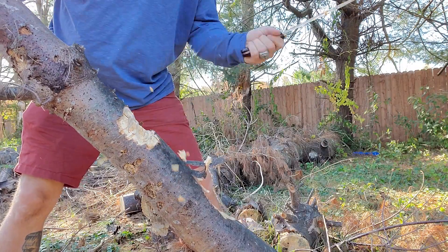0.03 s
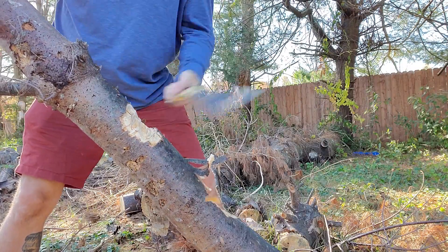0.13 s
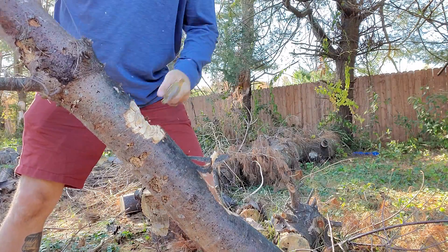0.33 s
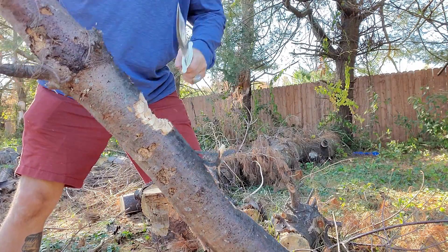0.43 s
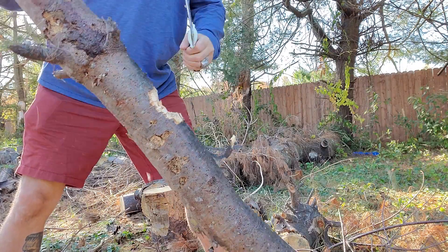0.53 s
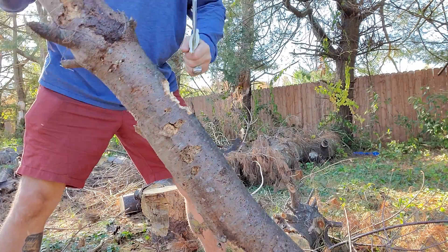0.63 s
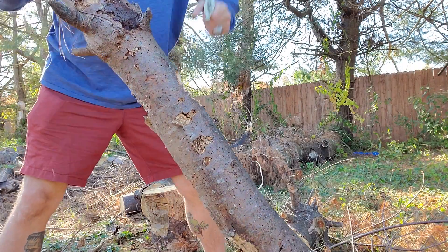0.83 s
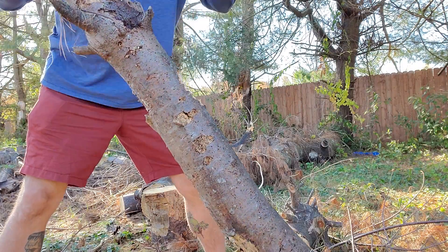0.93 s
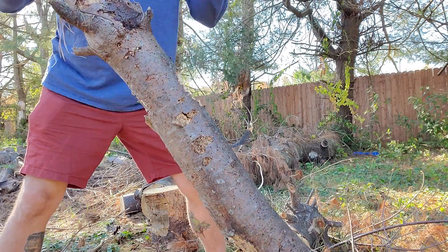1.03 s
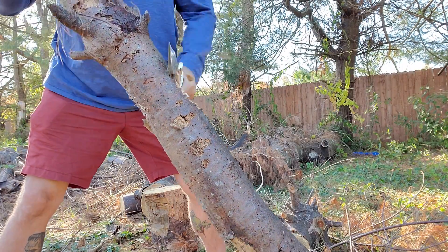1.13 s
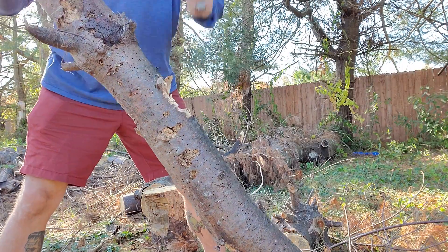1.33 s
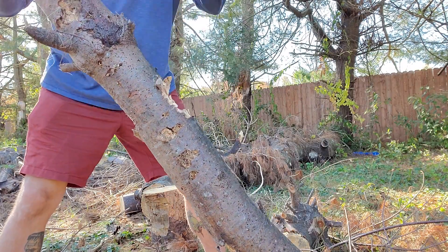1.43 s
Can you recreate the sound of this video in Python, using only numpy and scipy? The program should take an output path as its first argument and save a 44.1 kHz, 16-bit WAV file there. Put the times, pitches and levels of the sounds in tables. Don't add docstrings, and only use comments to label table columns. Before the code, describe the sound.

Two hard blade whacks into a leaning log in a yard, splintering wood, chips on leaves

```python
import sys
import numpy as np
from scipy import signal
from scipy.fft import rfft, irfft
from scipy.io import wavfile
from scipy.ndimage import uniform_filter1d, map_coordinates

SR = 44100
rng = np.random.default_rng(int(sys.argv[2]) if len(sys.argv) > 2 else 0)


def digitize_waveform(pressure):
    field = np.atleast_2d(pressure).T
    bounded = np.clip(field, -1, 1)
    quanta = np.round(bounded * 32767).astype(np.int16)
    wavfile.write(sys.argv[1], SR, quanta)


def elevation(decibels):
    levels = np.asarray(decibels, float)
    return 10 ** (levels / 20)


N = 66150
SIDES = np.array([[1], [-1]])

# start_s, crack_level_db, log_level_db, pan_db (left over right), hold_s
CHOPS = [
    (0.2238, -13.5, -14, -1, 0.018),
    (1.1778, -12.5, -17.5, -4.5, 0.0057),
]
# pitch_hz, level_db, t60_s (time to fade 60 dB)
LOG_NOTES = [
    [(129, -16, 0.17), (180.4, -8, 0.068), (223, 0, 0.04), (328.5, -9.5, 0.078), (373, 6.5, 0.049),
     (422.5, -11.5, 0.076), (524, -2, 0.12), (556, -6.5, .1), (766, 1.5, 0.088), (838.6, 4.5, 0.06),
     (870.6, 2.5, .08), (995, 4, 0.034), (1125, -3, 0.04), (1560, -1.5, .05)],
    [(133.5, -15, 0.14), (177, -9.5, 0.052), (245, -18, 0.046), (296, -8.5, 0.11), (363, -5, 0.12),
     (405, -8.5, 0.041), (549.5, 3.5, 0.09), (680, -0.5, 0.027), (737, 2.5, 0.09), (820, 3.5, 0.09),
     (957, 8, 0.045), (1094, 8.5, 0.047), (1337, -4, 0.07), (1482, -9, .07)],
]
# pitch_hz, width_hz, level_db
BLADE_NOTES = [
    [(1950, 207.5, 7), (2500, 230, -8.5), (3380, 160, 2), (4180, 250, -2.5), (5600, 550, -1.5),
     (6710, 220, -2.5), (11500, 800, -8)],
    [(2150, 100, 0.5), (2530, 150, -3.5), (3050, 83, 1), (3356, 190, 2), (4200, 230, -9.5),
     (6700, 250, 2.5), (14500, 600, -7)],
]
# after_blow_s, level_db
REBOUNDS = [
    [(.0165, -14), (.0198, -17), (.038, -27)],
    [(0.01413, -7.5), (.023, -10.5), (.05, -25.5)],
]
# after_blow_s, size
BIG_SNAPS = [
    [(.0003, 8), (.0011, 5.4), (.0018, 5.6), (.0037, 5.8)],
    [(.0003, 3.4), (.0009, 4.3), (.0016, 4), (.0023, 5.8), (.0031, 2.9)],
]
# delay_s of the log's answer, after the edge has sunk in
LOG_LATE_S = [0.00076, 0.003017]
# sag_s, how fast the tearing weakens
TEAR_SAG_S = [0.0046, 0.0062]
# level_db of the bright spray of torn fibres, against the crack
SPRAY_DB = [-7.5, -5]
SPRAY_EARLY_S = [.003, .0006]
SCATTER_DB = [-2.5, 2]
FIBRE_DB = [-41, -35]
FIBRE_T60_S = [0.24, 0.33]
# pitch_hz, level_db
CRUNCH_TONE = [(1300, -42.5), (2000, 1.5), (4000, -3), (7000, -9), (9500, -13.5), (16000, -7)]
# pitch_hz, level_db
FIBRE_TONE = [(600, -25), (1400, 1), (3000, -3), (6000, -9.5), (12000, -15)]
# pitch_hz, level_db
YARD_TONE = [(100, 1.5), (400, -13.5), (1500, -5), (4000, -9.5), (7000, -6.5), (9500, -12), (14000, -12.5)]
# start_s, peak_level_db, pitch_hz, pan_db, t60_s
CHIPS = [(0.0568, -40, 2100, -2, 0.027), (0.3268, -47, 8100, 7.5, 0.044), (0.3906, -53, 3050, -0.5, 0.038),
         (0.4608, -45.5, 9120, 2, 0.017), (0.5166, -45, 14700, 11.5, 0.055), (0.526, -41, 14630, -1, 0.035),
         (0.5584, -49.5, 5370, -17, 0.015), (0.5987, -55, 5900, 8, 0.018), (0.6286, -59, 14130, 13, 0.026),
         (0.665, -49, 14000, 12.5, 0.037), (0.727, -40, 11800, 0, 0.013), (0.7553, -45.5, 7460, 4, 0.033),
         (0.7713, -53.5, 2980, -6, 0.094), (0.823, -40.5, 5960, 3, 0.021), (0.8482, -59, 5060, -16, 0.031),
         (1.0093, -38, 5600, -2, 0.012), (1.0185, -48.5, 14000, -14, 0.052),
         (1.0203, -38.5, 5000, -3.5, 0.019), (1.0512, -34.5, 12300, -2, 0.027),
         (1.062, -46, 4800, -4, 0.029), (1.1166, -45.5, 2930, 0, 0.027), (1.288, -51.5, 3080, -7, 0.014),
         (1.3335, -53.5, 7200, 0, 0.03), (1.3385, -52.5, 3380, 4, 0.11), (1.3445, -50, 2660, 2, 0.11),
         (1.3555, -55, 6700, 0, 0.03), (1.3635, -46.5, 12500, -10, 0.02), (1.368, -43, 6540, -1, 0.035),
         (1.369, -48, 5030, -11.5, 0.046), (1.4145, -62.5, 14500, 0, .015), (1.4205, -59, 15200, 0, 0.013),
         (1.4355, -55, 12820, -6, 0.027), (1.4475, -54, 2320, 2.5, 0.05), (1.454, -51, 8640, -3, 0.014),
         (1.4865, -55.5, 11500, 0, .015), (0.382, -55, 13000, 0, .015), (.432, -60.5, 5600, -1, 0.14),
         (.596, -52.5, 5640, 4, 0.11), (0.7739, -64, 2500, -3, .05)]
# pitch_hz, level_db (per Hz)
LEAF_TONE = [(1100, -38.5), (2200, -7), (3800, -11), (5500, -5), (7800, -8), (11500, -5), (15500, 0.5),
             (16500, -6.5)]
# start_s, level_db, tilt_db (low half over high half if negative)
RUSTLE = [(0, -58, -5), (.09, -60.5, -3.5), (.15, -62.5, -1), (.3, -60, 0), (.42, -67.5, -2.5),
          (0.499, -61.5, 0), (0.524, -52.5, -4), (.58, -58.5, 0.5), (.69, -58, -2.5), (.72, -63, -0.5),
          (.85, -57.5, -1.5), (0.983, -64, -3.5), (1.032, -56, -4), (1.129, -59, -2), (1.3, -67, 4.5),
          (1.368, -64.5, -7), (1.42, -65.5, -4), (1.5, -66.5, -1.5)]
# pitch_hz, level_db (per Hz)
AIR_TONE = [(13, -57.5), (22, -36.5), (64, -1.5), (120, -20), (146, -25), (194, -23), (643, -36),
            (853, -33.5), (4000, -43.5), (5200, -75), (8800, -120)]
# pitch_hz, width_hz, level_db
HUM = [(59, 19.2, -51), (124, 11, -60)]
# pitch_hz, level_db
MIC_TONE = [(30, -12), (60, -1), (7500, 0), (9300, -6.5), (11000, -3.5), (16000, -4)]


def unit(x):
    return x / np.sqrt(np.mean(x ** 2) + 1e-30)


def colour(x, points):
    p, n = np.array(points, float), x.shape[-1]
    f = np.arange(n // 2 + 1) * SR / n + 1
    gain = elevation(np.interp(np.log(f), np.log(p[:, 0]), p[:, 1]))
    return irfft(rfft(x) * gain, n)


def ring(x, hz, width):
    r, w = np.exp(-np.pi * width / SR), 2 * np.pi * min(hz, .45 * SR) / SR
    return signal.lfilter([0, r * np.sin(w)], [1, -2 * r * np.cos(w), r * r], x)


def high_pass(x, order, hz):
    return signal.sosfilt(signal.butter(order, hz, "high", fs=SR, output="sos"), x)


def place(x, pan_db, lag_ms=0.):
    late = map_coordinates(x, [np.arange(len(x)) - lag_ms * SR / 1000], mode="nearest")
    return np.array([x * elevation(pan_db / 2), late * elevation(-pan_db / 2)])


def walk(rate):
    k = int(SR / rate)
    steps = np.repeat(rng.standard_normal(N // k + 1), k)
    return unit(uniform_filter1d(uniform_filter1d(steps, k), k)[:N])


def grit(n, scatter_db):
    return unit(rng.standard_normal(n) * elevation(scatter_db * rng.exponential(size=n)))


def grit_pair(n, scatter_db):
    return np.array([grit(n, scatter_db), grit(n, scatter_db)])


def rustle():
    table, t, out = np.array(RUSTLE), np.arange(N) / SR, 0
    low_half, high_half = [(8000, 0), (10000, -30)], [(8000, -30), (10000, 0)]
    for sign, half in ((-1, low_half), (1, high_half)):
        leaves = unit(colour(grit_pair(N, 2.2), LEAF_TONE))
        mid, side = colour(leaves, half)
        level_db = np.interp(t, table[:, 0], table[:, 1] + sign * table[:, 2] / 2)
        level_db = level_db + 0.5 * walk(20)
        out = out + elevation(level_db) * (mid + 0.94 * side * SIDES)
    return out


def air():
    mid, side = rng.standard_normal((2, N))
    side = colour(side, [(30, 2), (60, -27.0), (300, -7), (1500, 4)])
    top_hz, top_db = AIR_TONE[-1]
    wash = unit(colour(mid + side * SIDES, AIR_TONE + [(2 * top_hz, top_db - 25)]))
    low = colour(wash, [(150, 0), (300, -40)])
    return elevation(-52 - 3) * (elevation(1.5 * walk(6)) * low + elevation(walk(9)) * (wash - low))


def even(x):
    return unit(x / uniform_filter1d(x[0] ** 2, int(.1 * SR)) ** .4)


def hum():
    out = 0
    for hz, width, db in HUM:
        push = rng.standard_normal(N) + 0.19 * rng.standard_normal(N) * SIDES
        out = out + elevation(db) * even(ring(push, hz, width))
    return out


def early_ring():
    start_s, length_s, hz, width_hz = 0.037, 0.074, 1905, 330
    t, drag = np.arange(N) / SR, grit(N, 4.2)
    both = unit(ring(drag, hz, width_hz)) + 0.25 * unit(ring(drag, 1.35 * hz, width_hz))
    return elevation(-64) * both * np.exp(-.5 * ((t - start_s) / length_s) ** 2)


def chips():
    out, n = np.zeros((2, N)), 4096
    t = np.arange(n) / SR
    for at, db, hz, pan_db, t60 in CHIPS:
        leaf = colour(grit_pair(n, 2.5), LEAF_TONE)
        leaf = unit(colour(leaf, [(hz / 3, -12), (hz, 0), (hz * 3, -12)]))
        both = leaf[0] + leaf[1] * SIDES
        both = both + elevation(-4) * unit(ring(both, hz, .2 * hz))
        t60 = max(t60, .003)
        shape = np.minimum(t / (.035 * t60), 1) * elevation(-60 * t / t60)
        hit = both * shape * elevation(db - 3 + pan_db * SIDES / 2)
        i = int(at * SR)
        out[:, i:i + n] += hit[:, :N - i]
    return out


def tear(t, start, hold, fall, sag):
    before = np.maximum(start - t, 0)
    bite = elevation(-12) * np.exp(-before / 0.0022)
    swish = elevation(-29.5) * np.exp(-before / 0.011)
    rise = np.maximum(np.clip((t - start) / .0003, 0, 1), bite + swish)
    die = np.exp(-np.maximum(t - hold, 0) / fall - np.maximum(t, 0) / sag)
    return grit(N, 2.5) * rise * die


def crack_wood(at, crack_db, hold, sag, spray_db, early, big_snaps, blade):
    t = np.arange(N) / SR - at
    core = (t > 0) & (t < .005)

    def level(x):
        return x / np.sqrt(np.mean(x[core] ** 2))

    snaps = tear(t, 0, hold, 0.0016, sag)
    for after, size in big_snaps:
        snaps = snaps + size * (np.arange(N) == int((at + after) * SR))
    push, crack = np.diff(snaps, prepend=0), 0
    for hz, width, db in blade:
        crack = crack + elevation(db) * np.sqrt(width / 300) * ring(push, hz, 1.5 * max(width, 150)) / hz
    crack = level(high_pass(level(crack), 4, 1750))
    crunch = level(colour(tear(t, 0, hold, 0.0016, sag), CRUNCH_TONE))
    spatter = tear(t, -early, hold, 0.0025, sag) * elevation(1.5 * walk(600))
    spray = level(np.diff(spatter, 2, prepend=[0, 0]))
    return elevation(crack_db) * crack + elevation(crack_db - 3.5) * crunch, elevation(crack_db + spray_db) * spray


def ring_log(at, log_db, late, rebounds, notes):
    push_s, shudder_s = 0.00026, 0.007
    t = np.arange(N) / SR - at - late
    blow = np.exp(-.5 * (t / push_s) ** 2)
    for after, db in rebounds:
        blow = blow + elevation(db) * np.exp(-.5 * ((t - after) / push_s) ** 2)
    sinking = elevation(-11) * np.exp(-np.abs(t) / .006)
    tremble = np.where(t > -late, np.exp(-np.abs(t) / shudder_s), sinking)
    shudder = tremble * rng.standard_normal(N) * elevation(-11) / np.sqrt(shudder_s * SR)
    push = np.diff(blow / (3.61 * push_s * SR) + shudder, prepend=0)
    body = np.zeros((2, N))
    for k, (hz, db, t60) in enumerate(notes):
        wobble_db = 2.5 * walk(90) * np.clip(t / 0.0067, 0, 1)
        width = np.log(1000) / np.pi / min(t60, .03 + 24 / hz)
        note = elevation(db + wobble_db) * SR / (2 * np.pi * hz) * ring(push, hz, width)
        body += np.array([[1], [(-1) ** k]]) * note
    return elevation(log_db) * high_pass(body, 2, 90)


def yard(x):
    n = int(.4 * SR)
    t = np.arange(n) / SR
    tail = colour(np.array([grit(n, 2.5), grit(n, 0.83)]), YARD_TONE)
    tail = .7 * tail + .5 * tail[0]
    tail = tail * elevation(-60 * t / 0.24) * (t > 0.0015)
    tail = tail / np.sqrt(np.sum(tail ** 2) / 2)
    return elevation(-7) * signal.fftconvolve(x[None], tail, axes=1)[:, :N]


def fence(bright, body):
    smear_s = 0.0005
    boards = rng.standard_normal(401) * np.exp(-np.abs(np.arange(-200, 201)) / (smear_s * SR))
    bright = np.convolve(bright, boards / np.sqrt(np.sum(boards ** 2)), "same")
    echo = np.roll(elevation(-17) * bright + elevation(-27.5) * body, int(.0237 * SR))
    return place(echo, 7.5, -0.031)


def chops():
    out = np.zeros((2, N))
    for i, (at, crack_db, log_db, pan_db, hold) in enumerate(CHOPS):
        crack, spray = crack_wood(at, crack_db, hold, TEAR_SAG_S[i], SPRAY_DB[i], SPRAY_EARLY_S[i],
                                  BIG_SNAPS[i], BLADE_NOTES[i])
        body, side = ring_log(at, log_db, LOG_LATE_S[i], REBOUNDS[i], LOG_NOTES[i])
        out += place(crack, pan_db, 0.036) + place(spray, 0, .014)
        out += place(body, 0.61 * pan_db, 0.11) + 0.21 * side * SIDES
        out += fence(crack + spray, body)
        click = 1. * (np.arange(N) == int(at * SR))
        bang = colour(click, CRUNCH_TONE) * elevation(crack_db + SCATTER_DB[i] + 20.5)
        out += yard(bang + .25 * body) * elevation(3 * walk(150))
    return out


def fibres(at, db, t60):
    t = np.arange(N) / SR - at
    ticks = unit(colour(grit_pair(N, 5.5), FIBRE_TONE))
    shape = np.clip(t / .012, 0, 1) * elevation(-60 * np.maximum(t, 0) / t60)
    return elevation(db) * (ticks + ticks[0]) / 2 * shape


def low_chip():
    start_s, length_s = 0.304, .008
    t = np.arange(N) / SR - start_s
    return elevation(-55) * unit(ring(grit(N, 1), 1436, 120)) * np.exp(-.5 * (t / length_s) ** 2)


def scene():
    out = rustle() + air() + hum() + early_ring() + chips() + chops()
    for chop, db, t60 in zip(CHOPS, FIBRE_DB, FIBRE_T60_S):
        out = out + fibres(chop[0], db, t60)
    return out + low_chip()


def band_limit(x):
    return signal.sosfilt(signal.butter(12, 16970, fs=SR, output="sos"), x)


def record(dry):
    mirrored = np.concatenate([dry, dry[:, ::-1]], axis=1)
    x = np.tanh(colour(mirrored, MIC_TONE)[:, :N])
    x = signal.sosfilt(signal.ellip(8, .2, 60, 15900, fs=SR, output="sos"), x)
    return band_limit(x)


dry = scene()
out = record(dry)
digitize_waveform(out)
```